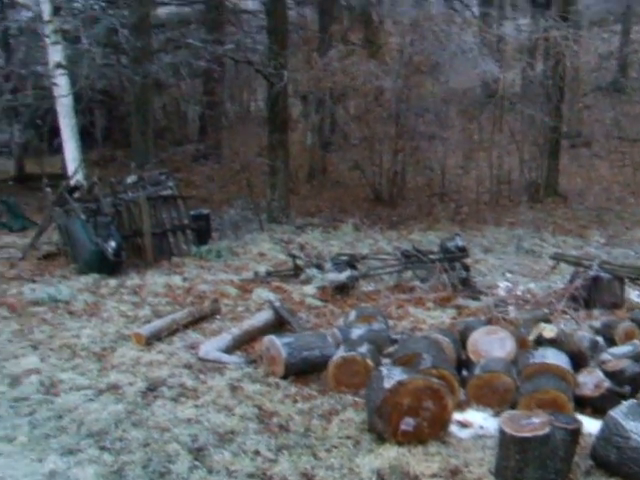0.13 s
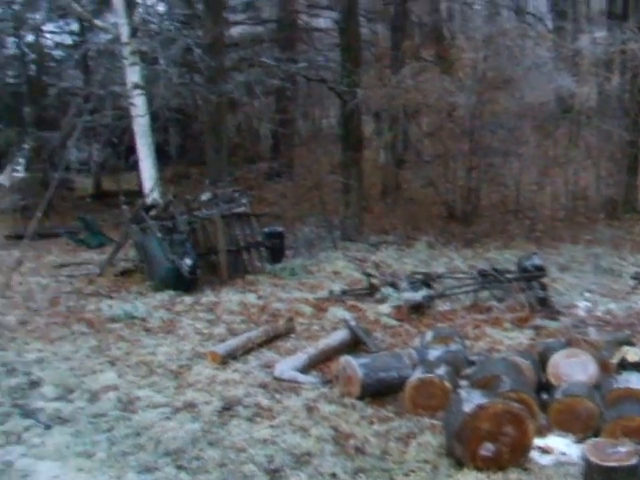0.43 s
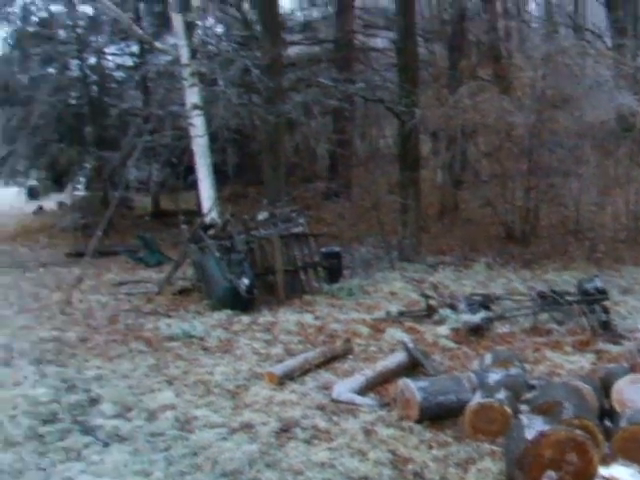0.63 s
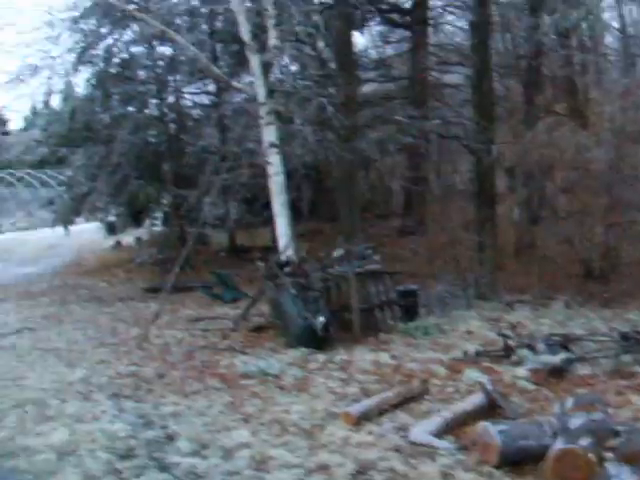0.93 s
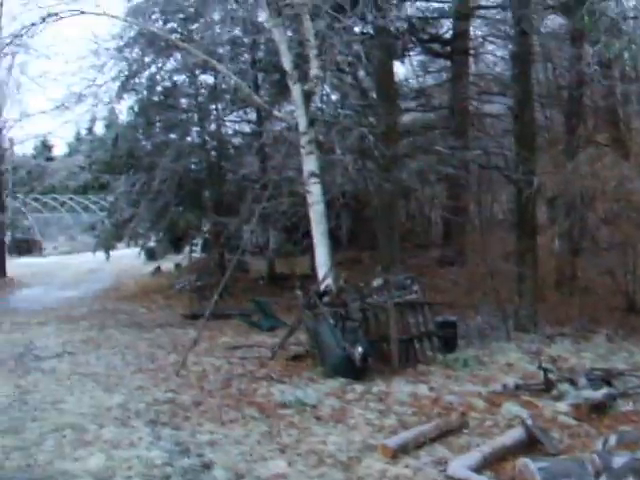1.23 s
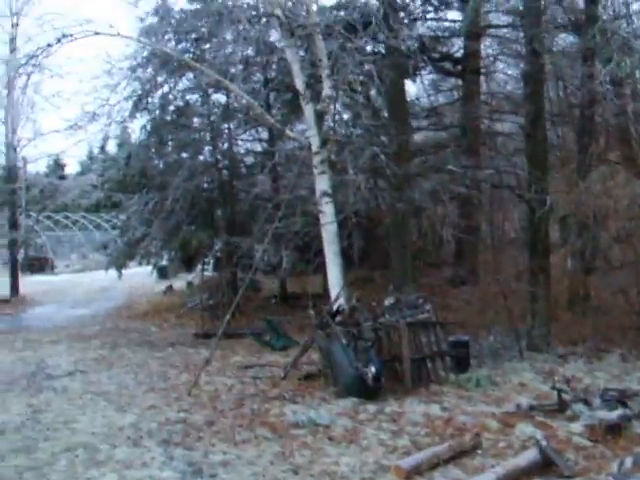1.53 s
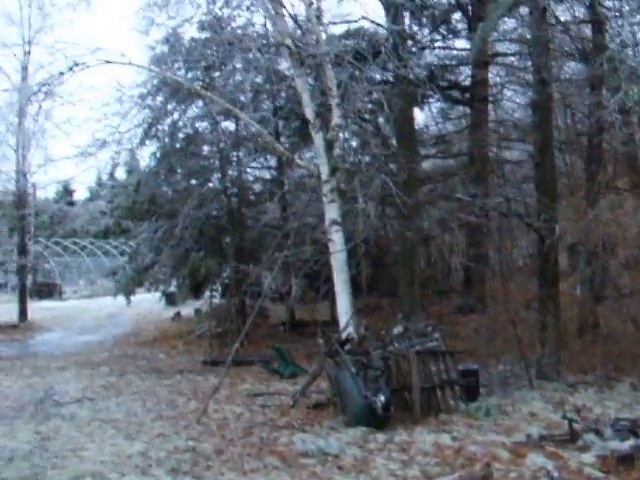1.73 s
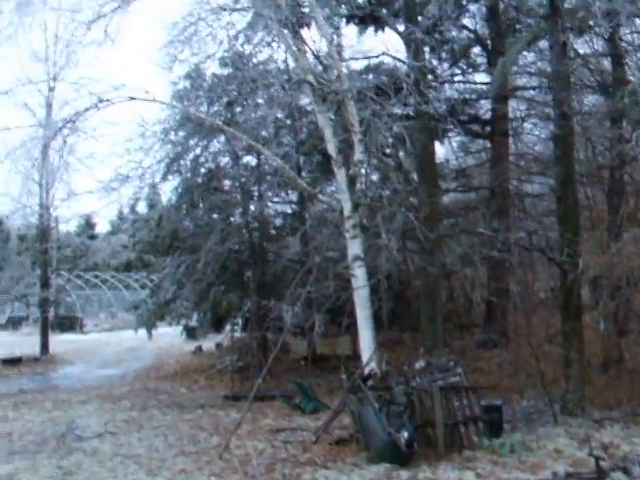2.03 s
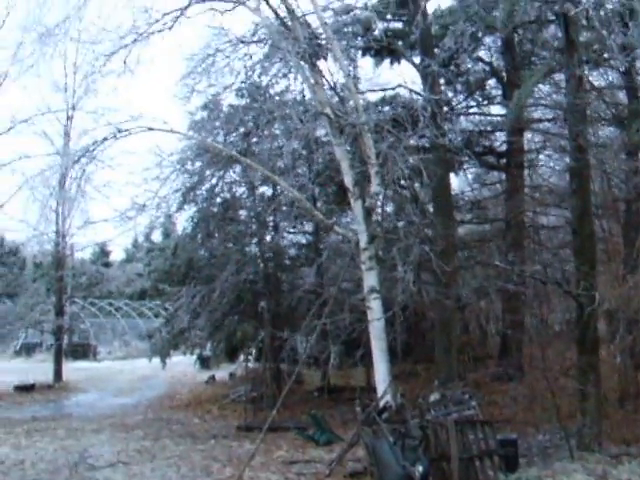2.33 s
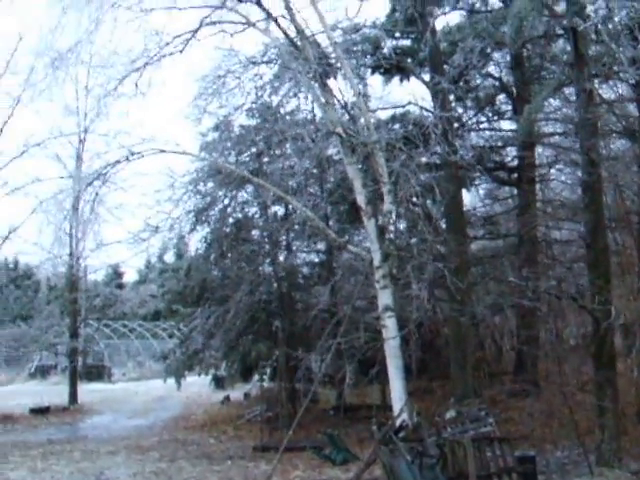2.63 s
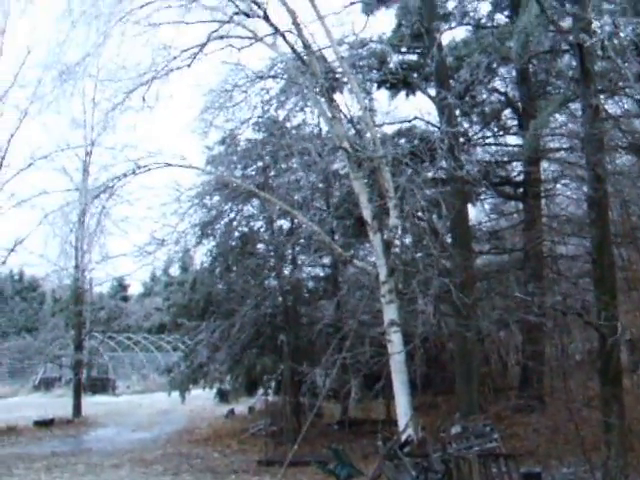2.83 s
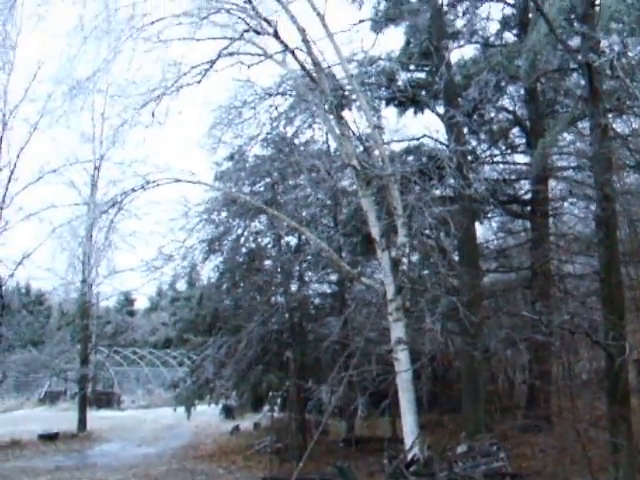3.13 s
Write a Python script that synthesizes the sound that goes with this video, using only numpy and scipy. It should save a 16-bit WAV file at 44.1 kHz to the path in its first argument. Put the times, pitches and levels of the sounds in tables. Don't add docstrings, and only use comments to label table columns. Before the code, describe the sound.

Icy drizzle patters on frozen twigs and leaves, over grainy hiss and a faint whine

```python
import sys
import numpy as np
from scipy import signal
from scipy.fft import rfft, irfft
from scipy.io import wavfile
from scipy.ndimage import uniform_filter1d, map_coordinates

SR = 44100
rng = np.random.default_rng(int(sys.argv[2]) if len(sys.argv) > 2 else 0)


def gain_from_decibels(decibels):
    exponent = np.asarray(decibels, float) / 20
    return 10 ** exponent


def master(y):
    cut = np.clip(np.atleast_2d(y).T, -1, 1)
    pcm = np.round(cut * 32767)
    wavfile.write(sys.argv[1], SR, pcm.astype(np.int16))


N = 145530


def unit(x):
    return x / np.sqrt(np.mean(x ** 2) + 1e-20)


def wobble(rate):
    knots = rng.standard_normal(int(N * rate / SR) + 4)
    return map_coordinates(knots, [np.arange(N) * rate / SR])


def place(starts, shapes):
    at = np.round(starts * SR).astype(int)[:, None] + np.arange(shapes.shape[1])
    return np.bincount(at.ravel(), shapes.ravel(), N + SR)[:N]


def taps(s, db, hz, t60, crack_db, splash_db, splash_s, attack_s, size, order=21):
    t = np.arange(size) / SR
    noise = rng.standard_normal((len(s), 2, size))
    noise = noise - uniform_filter1d(noise, size=order)
    db, hz, t60 = db[:, None], hz[:, None], np.abs(t60)[:, None]
    crack = noise[:, 0] * gain_from_decibels(crack_db - 60 * t / t60)
    splash = noise[:, 1] * gain_from_decibels(splash_db - 60 * t / splash_s)
    modes = np.sin(2 * np.pi * hz * t) + .25 * np.sin(2 * np.pi * .76 * hz * t)
    ring = modes * gain_from_decibels(-60 * t / t60)
    return place(s, gain_from_decibels(db) * (ring + crack + splash) * (1 - np.exp(-t / attack_s)))


# (time [s], level [dB], pitch [Hz], t60 [s])
NEAR_PELLETS = [(0.0384, -40.5, 5040, 0.01), (0.1507, -33, 4480, 0.0057), (0.1582, -39, 7060, 0.013),
                (0.1645, -38, 5030, 0.0076), (0.2898, -37, 5990, 0.0088), (0.2942, -36, 6300, 0.01),
                (0.2979, -37, 6020, 0.0058), (0.3079, -33, 6400, 0.0045), (0.4425, -33.5, 4460, 0.0062),
                (0.4447, -35, 4400, 0.0031), (0.8816, -43.5, 4790, 0.0069), (1.055, -39.5, 6940, 0.0059),
                (1.0783, -39.5, 4200, 0.0059), (1.0803, -41, 6750, 0.008), (1.1886, -45.5, 3720, 0.0064),
                (1.2269, -31.5, 7860, 0.0092), (1.2293, -28, 7560, 0.013), (1.2298, -38, 5810, 0.0096),
                (1.3243, -36, 4670, 0.0054), (1.5178, -37, 6550, 0.004), (1.5672, -37.5, 3540, 0.0051),
                (1.6897, -43.5, 3700, 0.0084), (1.7669, -42.5, 6700, 0.01), (1.7687, -43.5, 6010, 0.0094),
                (1.9484, -42.5, 3900, 0.0063), (2.0981, -41.5, 3430, 0.0057), (2.6703, -41, 6980, 0.01),
                (2.855, -36.5, 5750, 0.0052)]
# (time [s], level [dB], pitch [Hz])
FAR_PELLETS = [(0.0873, -47.5, 4490), (0.095, -34, 6600), (0.1701, -33, 4750), (0.2333, -35.5, 6120),
               (0.2467, -41, 6400), (0.301, -43, 5680), (0.3554, -39.5, 5400), (0.6563, -41.5, 6850),
               (0.757, -41, 7360), (0.8949, -37, 7340), (0.9363, -36, 5100), (1.2233, -32, 5170),
               (1.2389, -36.5, 7240), (1.2613, -39.5, 6130), (1.2894, -47, 5200), (1.7025, -49, 3800),
               (1.7553, -37.5, 4880), (1.9727, -38.5, 5530), (2.0577, -36.5, 5730), (2.0643, -49.5, 6200),
               (2.1306, -41.5, 3210), (2.1973, -41.5, 3440), (2.2316, -47, 4700), (2.8434, -42.5, 4520),
               (2.9381, -41.5, 4740), (2.9792, -50.5, 6960), (3.0844, -35, 3570), (3.1143, -44, 4780)]


def pellets():
    s, db, hz, t60 = np.transpose(NEAR_PELLETS)
    near = taps(s, db + 7.0, hz, .7 * t60, crack_db=-1.6, splash_db=-17, splash_s=.045,
                attack_s=.00015, size=2000, order=15)
    s, db, hz = np.transpose(FAR_PELLETS)
    far = taps(s, db + 1, hz, .0048 + 0 * s, crack_db=3.0, splash_db=-10.5, splash_s=.033,
               attack_s=.0004, size=2000)
    return near + far


# (time [s], level [dB], pitch [Hz], t60 [s])
LEAF_DROPS = [(0.0054, -41, 2560, 0.011), (0.0087, -34.5, 2247, 0.0087), (0.1228, -38.5, 1732, 0.019),
              (0.3519, -40.5, 1714, 0.017), (0.4542, -39.5, 1103, 0.017), (0.4628, -39.5, 1480, 0.017),
              (0.9988, -42.5, 2068, 0.01), (1.1016, -39, 1373, 0.0098), (1.1985, -34, 1530, 0.011),
              (1.2099, -41.5, 1790, 0.015), (1.6634, -35.5, 1167, 0.0085), (1.7638, -31, 1810, 0.0068),
              (1.8832, -39.5, 1300, 0.017), (1.9219, -38, 2110, 0.0086), (1.9338, -31.5, 2180, 0.0066),
              (3.111, -40.5, 1796, 0.02)]


def leaf_drops():
    s, db, hz, t60 = np.transpose(LEAF_DROPS)
    return taps(s, db + 1.5, hz, t60, crack_db=-2.5, splash_db=-12, splash_s=.046,
                attack_s=.00071, size=2000)


# (time [s], level [dB], pitch [Hz], t60 [s])
SHELTER_KNOCKS = [(0.2595, -38, 294, 0.051), (.268, -32.5, 339, 0.058), (0.2778, -39, 299, 0.052),
                  (0.289, -41.5, 250, 0.051), (.445, -50, 231, 0.047), (.462, -49.5, 220, 0.057),
                  (.878, -50.5, 487, 0.048), (1.199, -50, 274, 0.048), (1.224, -47.5, 280, 0.035),
                  (1.465, -32.5, 298, 0.048), (1.479, -40, 205.5, 0.068), (1.4916, -42, 196, 0.042),
                  (1.516, -49.5, 422, .06), (1.5675, -40, 946, 0.023), (1.569, -40, 273, 0.034),
                  (1.656, -39, 297, 0.038), (1.664, -38, 301, 0.033), (1.673, -44, 148, .07),
                  (1.883, -42.5, 231.5, 0.047), (1.894, -48, 758, 0.033), (2.577, -43, 460, 0.018),
                  (3.112, -50.5, 300, 0.035)]


def shelter():
    s, db, hz, t60 = np.transpose(SHELTER_KNOCKS)[:, :, None]
    sag = 4
    t = np.arange(6000) / SR
    phase = 2 * np.pi * hz * np.log(1 + sag * t) / sag
    spray = rng.standard_normal((len(s), 6000))
    dull_spray = uniform_filter1d(spray, size=24) - uniform_filter1d(spray, size=160)
    puff = dull_spray * gain_from_decibels(-2.5)
    overtone = gain_from_decibels(-8 - 90 * t / t60) * np.sin(1.9 * phase)
    ring = (np.sin(phase) + puff + overtone) * gain_from_decibels(-60 * t / t60)
    body_hz, body_db, body_t60 = 138, -25, .11
    body = gain_from_decibels(body_db - 60 * t / body_t60) * np.sin(2 * np.pi * body_hz * t)
    attack = 1 - np.exp(-t / .0012)
    return place(s[:, 0], gain_from_decibels(db + 3.0) * attack * (ring + body))


# (time [s], level [dB])
RAIN_STRENGTH = [
    (0.0, -52.5),
    (0.27, -51),
    (0.58, -50),
    (1.44, -50),
    (2.53, -50.5),
    (3.3, -51),
]
# (frequency [Hz], density [dB per Hz])
HISS_SPECTRUM = [(25, -1), (95, -7.5), (130, 4.5), (180, -1.5), (1500, -1), (3000, -6), (5400, -6),
                 (7600, -0.5)]


def drizzle():
    s, db = np.transpose(RAIN_STRENGTH)
    strength_db = np.interp(np.arange(N) / SR, s, db)

    z = signal.stft(rng.standard_normal(N), nperseg=512)[2]
    field = uniform_filter1d(rng.standard_normal(z.shape), size=8, axis=0)
    field = uniform_filter1d(field, size=8, axis=1)
    patchy = signal.istft(z * gain_from_decibels(unit(field)), nperseg=512)[1][:N]
    hz, density_db = np.transpose(HISS_SPECTRUM)
    colour = np.interp(np.log(np.fft.rfftfreq(N, 1 / SR) + 1), np.log(hz), density_db)
    hiss = unit(irfft(rfft(patchy) * gain_from_decibels(colour), N))
    hiss_db = strength_db + 1.82 + .56 * wobble(9) + wobble(35)

    patter_per_s, patter_db = 330, -52
    when, size, pitch, decay = rng.random((int(patter_per_s * N / SR), 4)).T
    pellet_db = patter_db - 3.2 * np.log(1 - .95 * size)
    patter = taps(when * N / SR, pellet_db, 1100 * 6.5 ** pitch, .003 + .006 * decay,
                  crack_db=2.0, splash_db=-13.5, splash_s=.034, attack_s=.00014, size=900)
    return gain_from_decibels(hiss_db) * hiss + patter * gain_from_decibels(strength_db - db.mean())


def camera():
    t = np.arange(N) / SR
    frame_hz, first_frame_s, cycles_per_frame = 29.97004, .012343, 262.5
    frame_part = (t - first_frame_s) * frame_hz % 1
    whine = gain_from_decibels(-55.8) * np.cos(2 * np.pi * cycles_per_frame * frame_part)
    hum = gain_from_decibels(-69.5 + 1.3 * wobble(6.1)) * np.sin(2 * np.pi * 59.99 * t)
    return np.sqrt(2) * (whine + hum)


def scene():
    return (pellets() + leaf_drops() + shelter() + drizzle() + camera())[None]


def roll_off(x):
    return signal.sosfilt(signal.butter(12, 9420, fs=SR, output="sos"), x)


def record(dry):
    rate_hz, step, bias = 16000, 1 / 181, .06
    count = N * rate_hz // SR
    slow = irfft(rfft(dry)[:, :count // 2 + 1], count) * count / N
    stepped = np.fft.fft(step * np.floor(slow / step + bias))
    images = stepped[:, np.arange(N // 2 + 1) % count]

    taps_count = 89
    lag = np.arange(taps_count) - taps_count // 2
    kernel = np.sinc(lag * rate_hz / SR) * np.kaiser(taps_count, 9)
    soft = np.abs(rfft(kernel / kernel.sum(), N))
    mix = irfft(images * soft, N) * N / count
    return roll_off(mix)


dry = scene()
out = record(dry)
master(out)
```